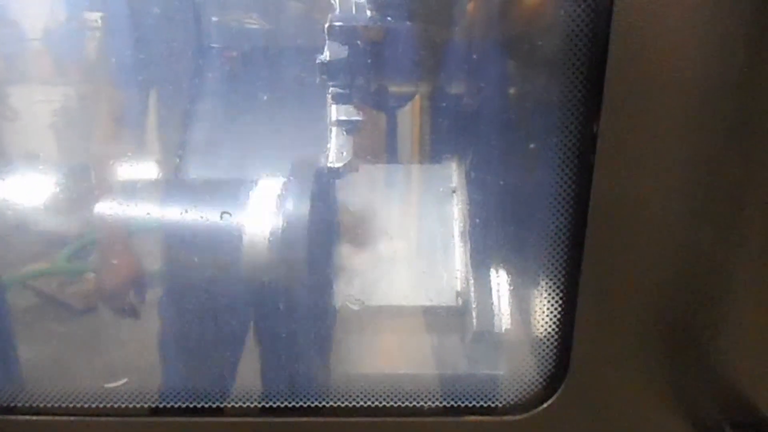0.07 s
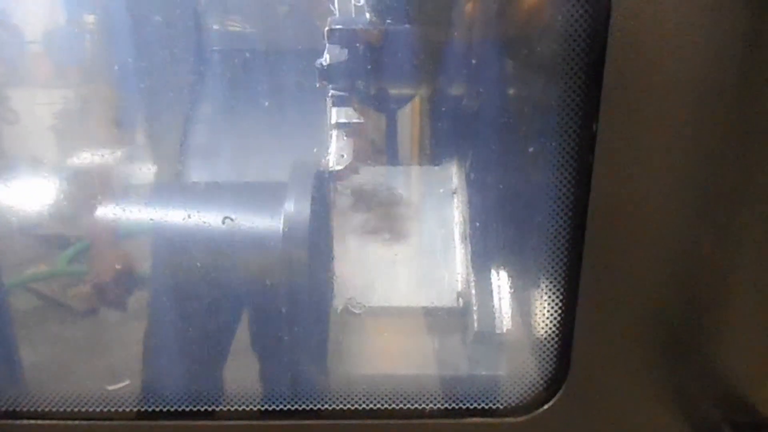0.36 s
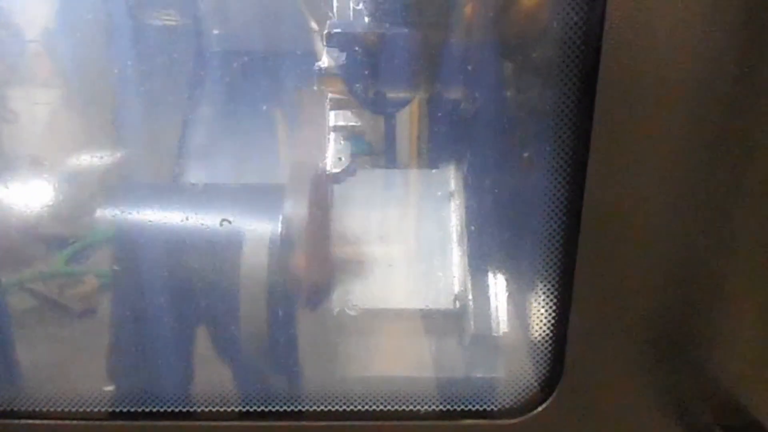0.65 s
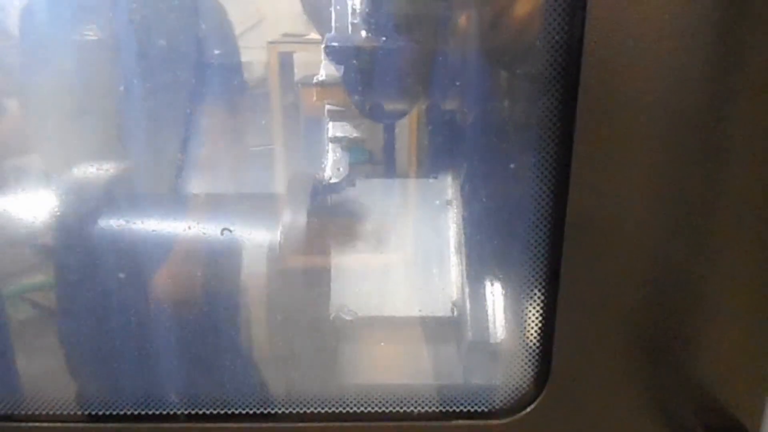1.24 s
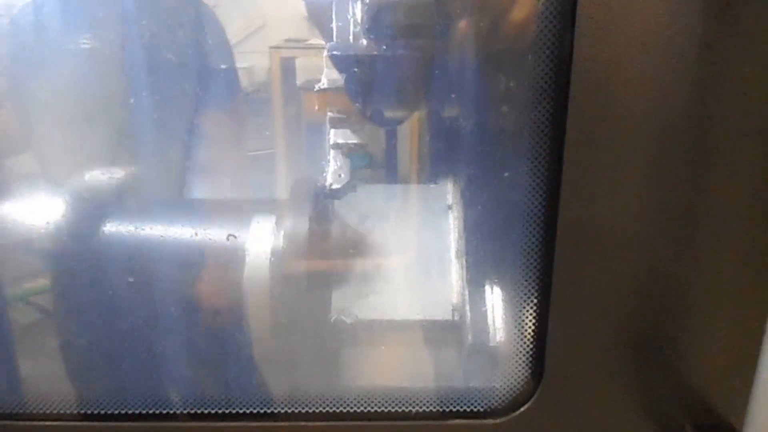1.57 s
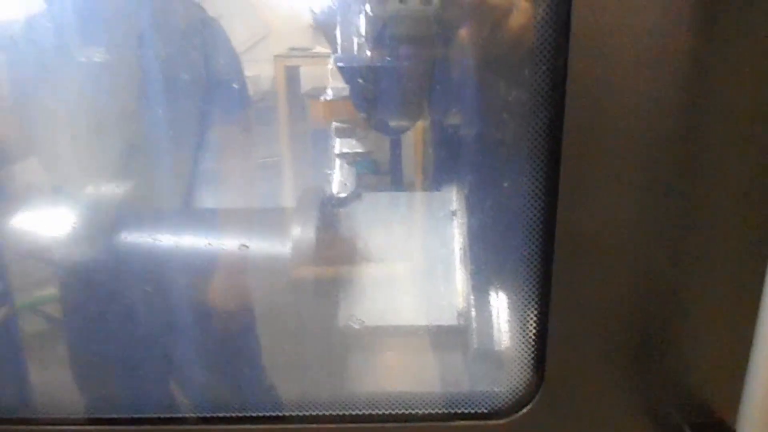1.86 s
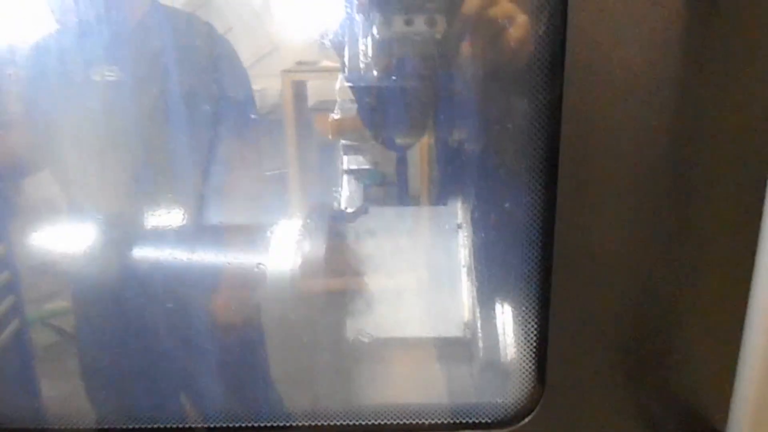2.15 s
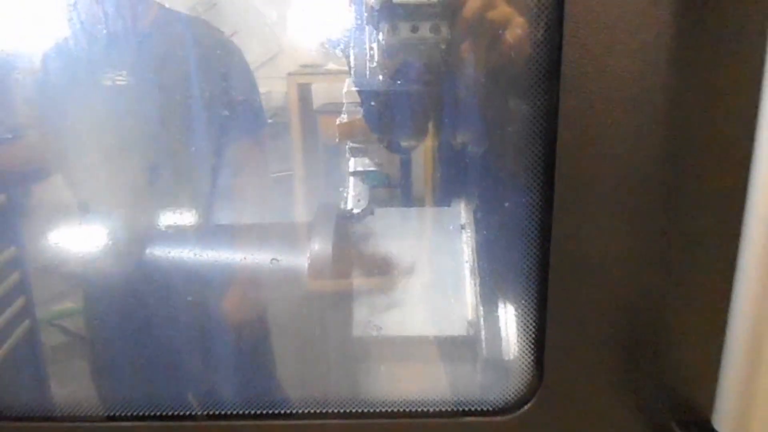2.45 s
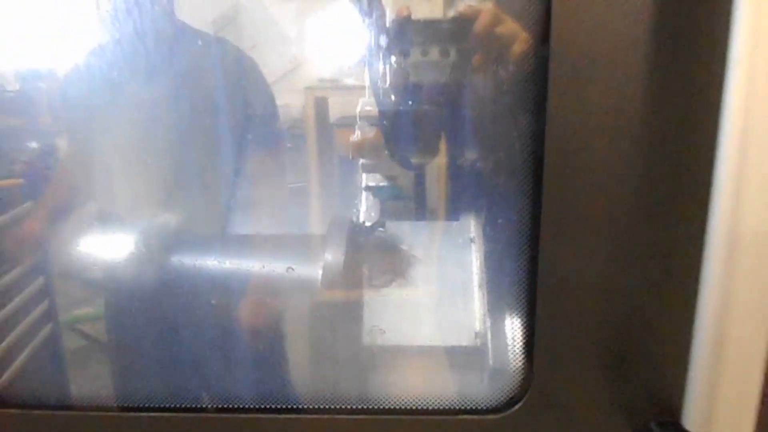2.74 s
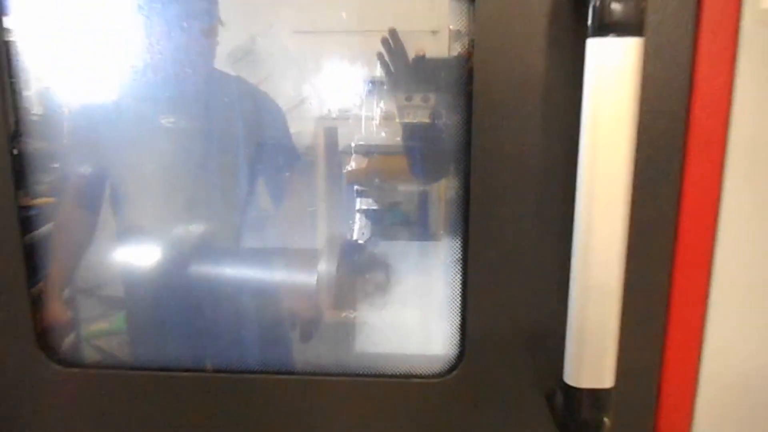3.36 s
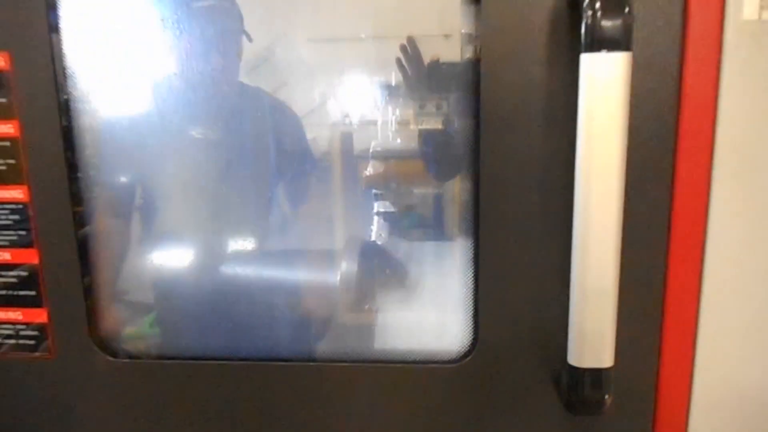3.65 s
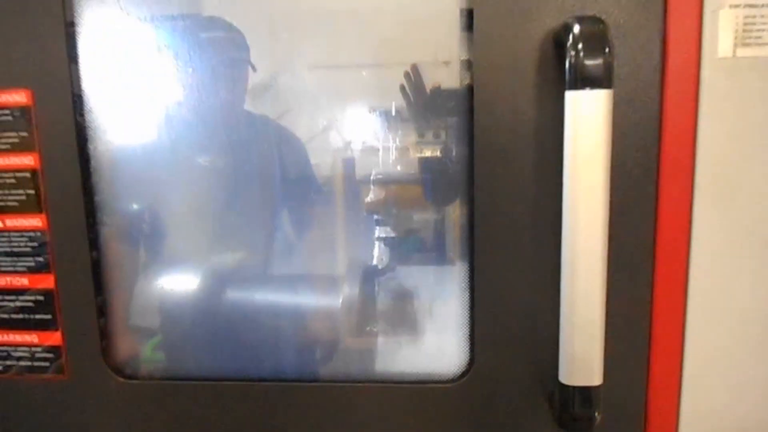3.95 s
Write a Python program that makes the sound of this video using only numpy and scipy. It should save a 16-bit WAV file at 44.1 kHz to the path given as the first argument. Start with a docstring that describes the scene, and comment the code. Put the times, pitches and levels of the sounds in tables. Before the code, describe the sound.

A running lathe's cooling fans rush steadily over a wavering motor hum and faint whines. Faint metal scrapes and a few short clacks come through, the last loudest and ringing, heard just outside its closed door in a workshop.

```python
"""A workshop, just outside the closed door of a running CNC lathe.
Cooling fans rush with turbulent air; a motor hums at one pitch among faint fan and drive whines.
Metal slides on metal in a few faint scrapes. The mechanism clacks: parts meet and chatter,
ring the steel, shake the enclosure panels and reverberate in the room."""
import sys
import numpy as np
from scipy import signal
from scipy.fft import rfft, irfft
from scipy.io import wavfile
from scipy.ndimage import uniform_filter1d

SR = 44100
rng = np.random.default_rng(int(sys.argv[2]) if len(sys.argv) > 2 else 0)


def unload_audio(sound):
    """Save the sound as a 16-bit wav file, at the path given as the first command line argument."""
    columns = np.transpose(np.atleast_2d(sound))
    # keep every value between -1 and 1, then stretch to whole-number steps
    steps = np.round(np.clip(columns, -1, 1) * 32767)
    wavfile.write(sys.argv[1], SR, steps.astype(np.int16))


N = 176400

# fan air spectrum: f/Hz, relative density/dB
AIR_SPECTRUM = [(25, -45), (50, -39), (72, -36.5), (112, -22), (145, -19.5), (200, -10.5), (255, -6),
                (280, -19.5), (310, -2.5), (360, -10.5), (450, -5), (505, -9.5), (540, 2), (600, -5),
                (700, -3.5), (830, -1.2), (930, 0), (1010, -8), (1080, -3), (1220, -5.5), (1285, -2),
                (1400, -7), (1900, -7.5), (2650, -5), (3080, -8.5), (3250, -10.5), (4000, -10.5),
                (4500, -13.5), (6500, -20.5), (8000, -26.5), (9800, -35.5), (10200, -54), (10800, -72)]
AIR_DB, PATCH_DB, SWELL_DB, AIR_FLUTTER_DB = -32.5, 0.94, 0.22, 0.3
# air boost around RUSH_HZ: t/s, gain/dB
RUSH_GAIN = [(0, 2.5), (.2, 1.5), (.5, 1.6), (.7, 0.3), (1.05, 2.5), (1.5, 1), (1.7, 1.8), (1.88, 0),
             (2.1, 2.2), (2.85, -0.4), (3.1, 3), (3.38, 0.5), (3.7, 2.5), (4, 0.5)]
RUSH_HZ, RUSH_WIDTH_OCT = 950, 0.56
# slight rise of the hiss above HISS_HZ: t/s, gain/dB
HISS_GAIN = [(0, -1), (.6, -0.16), (1.6, 0), (2.6, 0.3), (3.3, 0.2), (3.7, 0.5), (4, 0.9)]
HISS_HZ = 1500
# motor hum envelope: t/s, level/dB
HUM_LEVEL = [(0, -42.5), (.25, -37), (.31, -43.5), (.38, -38), (.44, -45.5), (.57, -38), (.66, -43),
             (.97, -38.5), (1.19, -43.5), (1.29, -39), (1.41, -40.5), (1.57, -35), (1.69, -39), (1.77, -40),
             (1.84, -41.5), (2.03, -43), (2.17, -35.5), (2.25, -42.5), (2.33, -36), (2.4, -49),
             (2.55, -37.5), (2.68, -41), (2.86, -34.5), (3.05, -41), (3.22, -36), (3.42, -55),
             (3.56, -38.5), (3.67, -45), (3.76, -37.5), (4, -55)]
HUM_HZ, HUM_WANDER_HZ, HUM_FLUTTER_DB, HUM_FLUTTER_HZ = 558.9, 0.33, 1.63, 23.96
# fan and drive whines: f/Hz, level/dB
WHINE_TONES = [(120, -72), (387.5, -59.5), (641.5, -51.5), (773, -52.5), (835, -50.5), (882, -56),
               (1055, -49.5), (1159, -53.5), (1282, -56), (2318, -62), (2704, -60)]
WHINE_WANDER_HZ, WHINE_WAVER_DB = 2.9, 2.5
# metal slides: t/s, length/s, level/dB, centre/Hz, width/Hz
SCRAPE_EVENTS = [(0.437, 0.097, -50.5, 7000, 250), (0.26, 0.26, -47, 3400, 130),
                 (1.496, 0.16, -58, 7600, 1500), (1.508, 0.1, -45, 5700, 2000),
                 (1.52, 0.09, -61, 9450, 250)]
# mechanism blows: t/s, level/dB, rattle/s, release/s, bright gain/dB, top gain/dB,
# steel ringing/0-1, relative thump/dB, relative room/dB
CLACK_EVENTS = [(1.0513, -30, 0.0075, 0.011, 3, 0.5, 0.1, -40, -0.5),
                (1.2469, -19.5, 0.008, 0.0078, -4, -8, 0, -44, -5.5),
                (1.261, -25.5, 0.0075, 0.011, -9, -10, 0.4, -37, -7),
                (1.278, -27, .005, .004, -10, -12, 0.2, -43, -2),
                (1.8937, -28, 0.0017, 0.0017, 6.5, 18.5, 0.6, -48, -2.5),
                (1.9426, -24, 0.0099, 0.0023, -5, 1.5, 0, -53, -3.5),
                (1.9556, -26, 0.0055, 0.0018, -8, -10, .3, -57, -5),
                (1.981, -32.5, 0.029, 0.0091, -8, -2, 0.2, -54, -8),
                (2.3643, -13.3, 0.0085, 0.0046, 3.5, 9.5, 1, -50, -4.5),
                (2.379, -22, 0.0035, 0.0027, -5.5, 6, 0.8, -31.5, -1)]
# base clack spectrum: f/Hz, relative density/dB
CLACK_SPECTRUM = [(30, -35), (90, -19.5), (300, -13.5), (900, -7), (1400, 3), (2000, -0.5), (2800, 3),
                  (3500, -3), (5500, 2.5), (6800, -4), (7800, -12), (9600, -15), (10200, -26), (11000, -28),
                  (16000, -46)]
CLACK_ATTACK_S, BRIGHT_HZ, BRIGHT_WIDTH_OCT, TOP_HZ = 0.0011, 5260, 0.72, 7230
# steel resonances: f/Hz, width/Hz, crack boost at full ringing/dB, relative ring level/dB
STEEL_MODES = [(1410, 75, -6.5, -18), (1660, 79, 4, -21), (2250, 58, -2, -12), (2923, 150, 10, -7),
               (3698, 140, 17, -12), (4060, 74, 5, -23), (4600, 70, 10.5, -14), (4940, 90, 11.5, -13),
               (5200, 220, 3, -24), (6350, 65, 11, -12.5), (6450, 70, 10.5, -16.5), (6530, 70, 12, -22),
               (7330, 90, 7, -18), (7440, 110, 14.5, -18), (7972, 100, 15, -18), (8770, 150, 6, -28),
               (12100, 200, 13, -31)]
STEEL_RING_DB, STEEL_T60_S = -11, 0.4
# enclosure panel modes: f/Hz, relative level/dB, t60/s
PANEL_MODES = [(82.7, -6.5, 1.1), (97, -0.5, 1.1)]
PANEL_RISE_S = 0.022
# workshop reverberation: f/Hz, t60/s
ROOM_DECAY = [(200, 1), (1500, 0.71), (4000, 0.69), (7000, 0.44), (10000, 0.42)]
ROOM_RISE_S, ROOM_STEEL_SHARE = 0.012, 0.55
CUTOFF_HZ, LEAK_EDGE_HZ, LEAK_DB = 10080, 16000, -33.5


def amp(db):
    """Decibels to gain."""
    return 10 ** (np.asarray(db) / 20)


def unit(x):
    """Scale to rms 1."""
    return x / np.sqrt(np.mean(x ** 2) + 1e-20)


def at_hz(points, hz):
    """Interpolate on a log-frequency axis."""
    f, value = np.transpose(points)
    return np.interp(np.log(hz + 1), np.log(f + 1), value)


def bell(hz, centre_hz, width_oct):
    """Gaussian band in log frequency, peak 1."""
    return np.exp(-(np.log2((hz + 1) / centre_hz) / width_oct) ** 2 / 2)


def shelf(hz, edge_hz, order):
    """High shelf, 0 to 1."""
    return 1 - 1 / (1 + (hz / edge_hz) ** order)


def add(mix, start_s, sound):
    """Mix a sound in at start_s."""
    part = mix[round(start_s * SR):][:len(sound)]
    part += sound[:len(part)]


def drift(t, rate_hz):
    """Random motion in the decade below rate_hz, rms 1."""
    rates_hz = np.geomspace(rate_hz / 10, rate_hz, num=20)
    return unit(sum(np.sin(2 * np.pi * (f * t + rng.random())) / np.sqrt(f) for f in rates_hz))


def tone(hz, wander_hz):
    """Sine with wandering pitch, rms 1."""
    t = np.arange(N) / SR
    pitch_hz = hz + wander_hz * np.interp(t, t[::100], drift(t[::100], rate_hz=8))
    return np.sqrt(2) * np.sin(2 * np.pi * (np.cumsum(pitch_hz) / SR + rng.random()))


def ring(modes):
    """Damped modes of random polarity, 1 s."""
    t = np.arange(SR) / SR
    return sum(amp(db - 60 * t / t60_s) * np.sin(2 * np.pi * hz * t) * rng.choice([-1, 1])
               for hz, db, t60_s in modes)


def minimum_phase(gain_db):
    """Impulse response of a spectrum: no pre-ring, energy 1."""
    log_gain = np.log(amp(np.r_[gain_db, gain_db[-2:0:-1]]))
    taps = np.fft.ifft(np.exp(np.conj(signal.hilbert(log_gain)))).real
    return taps / np.linalg.norm(taps)


def fans(size=2048):
    """Turbulent air: drifting spectral patches, slow swell, slight flutter."""
    hop = size // 4
    t, hz = np.arange(N // hop + 5) * hop / SR, np.fft.rfftfreq(size, 1 / SR)
    real, imag, patches = rng.standard_normal((3, len(t), len(hz)))
    patches = uniform_filter1d(patches, size=8, axis=0)
    patch_db = PATCH_DB * unit(uniform_filter1d(patches, size=14, axis=1))
    swell_db = SWELL_DB * drift(t, rate_hz=5)[:, None]
    rush_db = np.interp(t, *np.transpose(RUSH_GAIN))[:, None] * bell(hz, RUSH_HZ, RUSH_WIDTH_OCT)
    hiss_db = np.interp(t, *np.transpose(HISS_GAIN))[:, None] * shelf(hz, HISS_HZ, order=4)
    frames = (real + 1j * imag) * amp(at_hz(AIR_SPECTRUM, hz) + patch_db + swell_db + rush_db + hiss_db)
    air = signal.istft(frames.T, nperseg=size, noverlap=size - hop)[1][:N]
    flutter_db = AIR_FLUTTER_DB * unit(uniform_filter1d(rng.standard_normal(N), size=300))
    return amp(AIR_DB) * unit(air * amp(flutter_db))


def motors():
    """Motor hum that flutters, swells and fades, plus wavering fan and drive whines."""
    t = np.arange(N) / SR
    coarse_t = t[::200]
    flutter_db = HUM_FLUTTER_DB * np.interp(t, coarse_t, drift(coarse_t, HUM_FLUTTER_HZ))
    hum_db = np.interp(t, *np.transpose(HUM_LEVEL)) + flutter_db
    mix = amp(hum_db) * tone(HUM_HZ, HUM_WANDER_HZ)
    for hz, level_db in WHINE_TONES:
        waver_db = WHINE_WAVER_DB * np.interp(t, coarse_t, drift(coarse_t, rate_hz=13))
        mix += amp(level_db) * unit(amp(waver_db) * tone(hz, WHINE_WANDER_HZ))
    return mix


def scrape(length_s, level_db, centre_hz, width_hz):
    """Metal sliding on metal: one band of hiss under a half-sine envelope."""
    t, hz = np.arange(SR) / SR, np.fft.rfftfreq(SR, 1 / SR)
    band = 1 / (1 + (2 * (hz - centre_hz) / width_hz) ** 2)
    hiss = irfft(rfft(rng.standard_normal(SR)) * band)
    return amp(level_db) * unit(hiss) * np.sin(np.pi * np.minimum(t / length_s, 1))


def clack(level_db, rattle_s, release_s, bright_db, top_db, ringing, thump_db, room_db, size=4096):
    """Parts meet and chatter briefly, exciting steel, panels and room."""
    t, hz = np.arange(SR) / SR, np.fft.rfftfreq(size, 1 / SR)
    envelope = np.minimum(t / CLACK_ATTACK_S, 1) * np.exp(-np.maximum(t - rattle_s, 0) / release_s)
    chatter = rng.standard_normal(SR) * envelope
    colour_db = at_hz(CLACK_SPECTRUM, hz) + bright_db * bell(hz, BRIGHT_HZ, BRIGHT_WIDTH_OCT)
    colour_db += top_db * shelf(hz, TOP_HZ, order=10)
    steel_db = ringing * sum(boost_db / (1 + (2 * (hz - mode_hz) / width_hz) ** 2)
                             for mode_hz, width_hz, boost_db, _ in STEEL_MODES)
    crack = signal.fftconvolve(chatter, minimum_phase(colour_db + steel_db))[:SR]
    steel = ring([(mode_hz, ring_db, STEEL_T60_S) for mode_hz, _, _, ring_db in STEEL_MODES])
    ping = ringing * amp(STEEL_RING_DB) * steel * np.minimum(t / rattle_s, 1)
    tail = amp(room_db) * np.linalg.norm(chatter) * room_tail(colour_db + ROOM_STEEL_SHARE * steel_db)
    thump = amp(thump_db) * ring(PANEL_MODES) * np.minimum(t / PANEL_RISE_S, 1)
    return amp(level_db) * (crack + ping + tail + thump)


def room_tail(colour_db, size=512):
    """Diffuse tail of one blow, energy 1: builds up, then each band decays at its own rate."""
    hz, t, noise = signal.stft(rng.standard_normal(SR), SR, nperseg=size)
    band_db = np.interp(hz, np.linspace(0, SR / 2, num=len(colour_db)), colour_db)
    decay_db = -60 * t / at_hz(ROOM_DECAY, hz)[:, None]
    tail = signal.istft(noise * amp(band_db[:, None] + decay_db), SR, nperseg=size)[1][:SR]
    tail *= np.minimum(np.arange(SR) / SR / ROOM_RISE_S, 1)
    return tail / np.linalg.norm(tail)


def scene():
    """All sources, identical in both channels."""
    mono = fans() + motors()
    for start_s, *blow in CLACK_EVENTS:
        add(mono, start_s, clack(*blow))
    for start_s, *slide in SCRAPE_EVENTS:
        add(mono, start_s, scrape(*slide))
    return np.array([mono, mono])


def record(dry):
    """Steep low-pass; a trace of treble leaks through up to LEAK_EDGE_HZ."""
    lowpass = signal.firwin(401, CUTOFF_HZ, window=("kaiser", 8), fs=SR)
    leak = amp(LEAK_DB) * signal.firwin(401, LEAK_EDGE_HZ, window=("kaiser", 8), fs=SR)
    return signal.oaconvolve(dry, (lowpass + leak)[None], "same", axes=1)


dry = scene()
out = record(dry)
unload_audio(out)
```